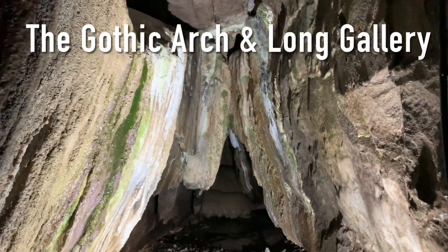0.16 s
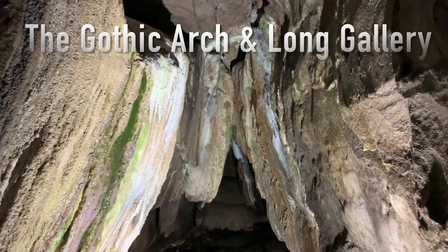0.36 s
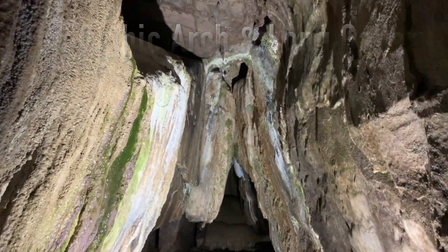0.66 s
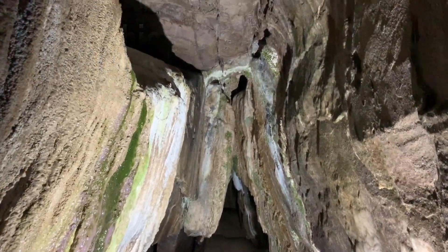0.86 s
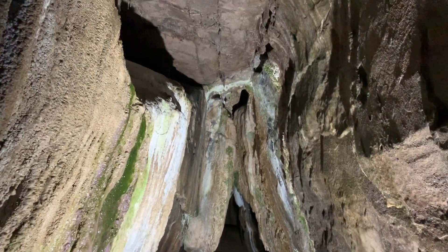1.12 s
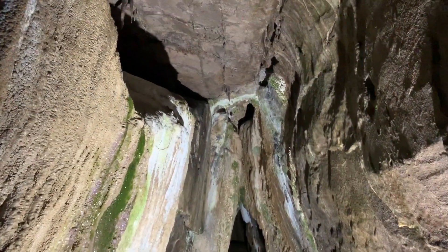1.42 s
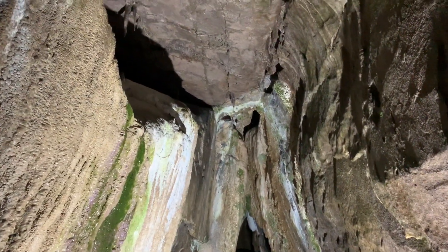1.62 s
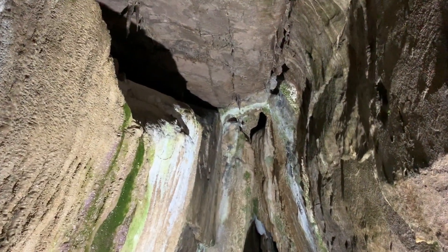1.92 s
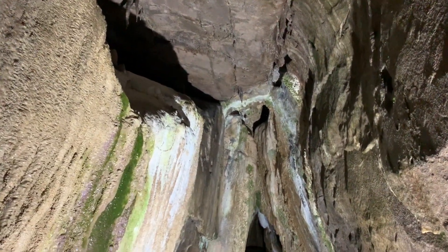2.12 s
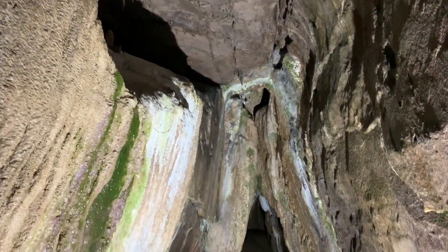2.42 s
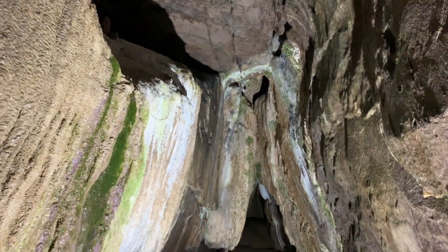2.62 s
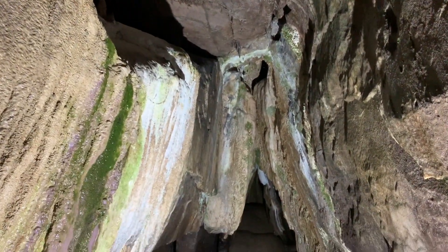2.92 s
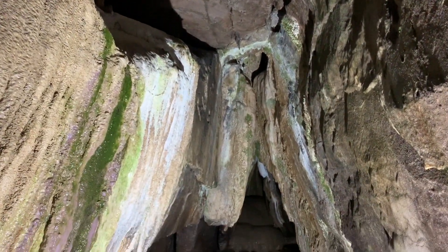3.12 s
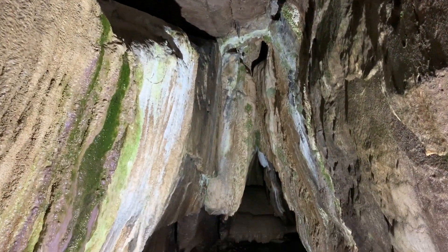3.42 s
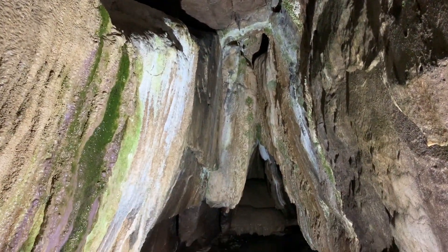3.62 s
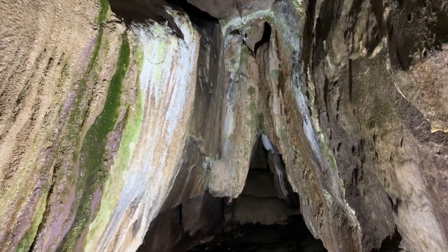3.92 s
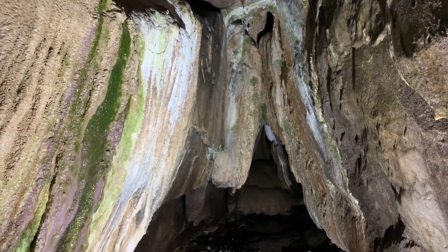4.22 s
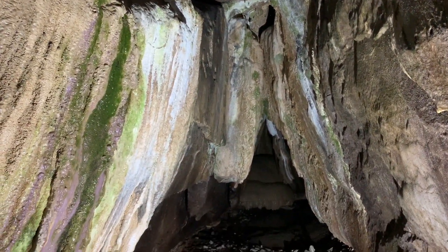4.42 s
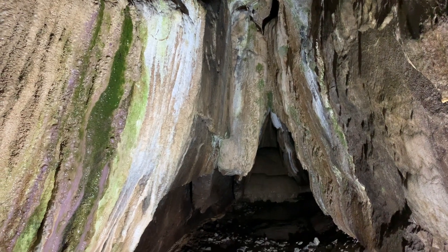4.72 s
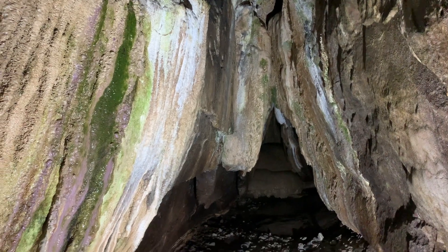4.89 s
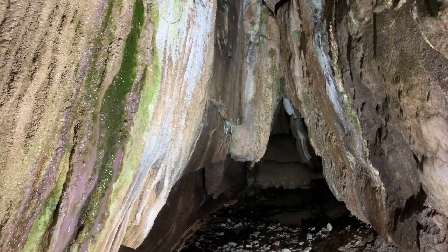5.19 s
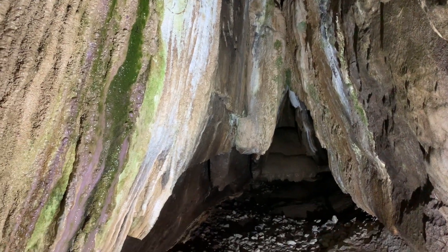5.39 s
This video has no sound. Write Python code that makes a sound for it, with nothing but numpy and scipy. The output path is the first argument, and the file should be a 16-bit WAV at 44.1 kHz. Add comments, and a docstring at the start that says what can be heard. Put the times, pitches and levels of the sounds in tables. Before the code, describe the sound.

A small damp cave, already dripping and echoing as the sound begins. Near drops plop into shallow water, hollow and slightly rising in pitch, crowded in the first half second with a bright plink at 0.3. A loud, dry, woody tick clicks close by at 0.4, a softer one at 0.9. Plops and crisp spatters continue; the dripping thins from about 1.25, with a sharp hissy splash at 1.5. Around 2.05-2.25 a full plop leads into low, gulping bubbles, with another deep gulp at 2.6. Drops thicken again after 3.1; glassy high plinks ring at 3.9 and most strongly at 4.05, with a lower one at 4.16. From 5.05 to the end at about 5.5, plops, bright plinks and low gulps gather. Throughout, far trickling, wavering fine spray, dull wash and faint low rumble surround the wide stereo pair, with short stone reverberation.

```python
"""A narrow rock cave, with water dripping from the roof into a shallow pool, heard by two microphones.
Near drops ring as damped, climbing sines or burst as hissing noise; the walls draw both out into tails.
Larger air pockets gulp now and then, a few dry ticks tap close by, and many far drops trickle and spatter.
Fine spray hisses behind, over a low rumble and wash; the treble of all but the direct drops and ticks
reaches the right microphone first."""
import sys
import numpy as np
from scipy import signal
from scipy.fft import rfft, irfft, next_fast_len
from scipy.io import wavfile

SR = 44100
rng = np.random.default_rng(int(sys.argv[2]) if len(sys.argv) > 2 else 0)


def store_pcm(level_fs):
    """Save levels as 16-bit WAV."""
    pcm = np.round(np.clip(level_fs, -1, 1) * 32767).astype(np.int16)
    wavfile.write(sys.argv[1], SR, np.atleast_2d(pcm).T)


N = 244755
LEAD = SR // 2   # samples that sound before the start, so that the cave already rings
PLACES = 6   # spots in the cave, each with its own echoes
SIZE = next_fast_len(N + 2 * SR)
HZ = np.maximum(np.arange(SIZE // 2 + 1) * SR / SIZE, 1)   # frequency of each spectrum bin

# near drops that trap a bubble: t/s, start level/dB, f/Hz, left minus right/dB, cycles to fall 60 dB
BUBBLE_DROPS = [(.102, -46, 792, -12, 60), (.174, -34, 910, 9.5, 24), (.204, -27, 695, -8, 70),
                (.263, -36, 694, 12.5, 59), (.297, -35, 692, -4, 78), (.2981, -26.5, 4140, -1, 37),
                (.352, -35, 707, 5, 47), (.539, -42.5, 712, -5, 54), (.672, -32.5, 812, 5, 20),
                (.707, -36, 882, -6, 39), (.837, -37, 926, 5, 50), (1.015, -40, 2360, -2, 33),
                (1.027, -48.5, 805, 18, 63), (1.159, -37.5, 823, -3, 35), (1.187, -33.5, 917, 7, 25),
                (1.229, -36, 1316, 8, 43), (1.508, -41, 763, -1, 51), (1.927, -29.5, 1020, 12, 25),
                (2.045, -26, 865, 6, 11.5), (2.304, -38.5, 1200, 7, 30), (2.614, -43, 1127, 6, 46),
                (2.69, -48, 538, 6, 80), (2.775, -44.5, 700, 8, 45), (2.909, -42.5, 1205, 13, 41),
                (2.989, -35.5, 846, -3, 20), (3.145, -35, 807, 8, 75), (3.279, -36, 630, -1, 73),
                (3.311, -27.5, 824, 3, 31.4), (3.345, -39.5, 655, 4, 60), (3.357, -40, 1154, 8, 33),
                (3.519, -46.5, 730, 12, 37), (3.768, -43.5, 880, -7, 36), (3.79, -42, 876, 6, 38),
                (3.85, -33.5, 997, 6, 34), (3.861, -35, 1060, 7, 34), (3.89, -31.5, 3370, -2, 37),
                (3.963, -37, 810, 13.5, 73), (3.994, -45.5, 831, 21, 84), (4.0454, -18.5, 4500, -3, 36),
                (4.129, -36, 1223, 10, 45), (4.1603, -23.5, 2020, -2, 17), (4.189, -39.5, 665, 1.5, 63),
                (4.268, -43, 1030, 7, 64), (4.333, -44.5, 731, -5, 104), (4.3669, -38.5, 2880, 6, 45),
                (4.445, -42, 1980, 0, 40), (4.519, -39, 647, 2, 50), (4.545, -42, 1410, 0, 50),
                (4.55, -38, 612.4, 6.5, 115), (4.818, -41, 672, 1.5, 160), (4.88, -44, 1055, 7, 43),
                (5.058, -41, 1510, 6, 55), (5.061, -30.5, 686, 6, 42), (5.08, -40, 872, 10, 42),
                (5.152, -32, 4760, 2, 25), (5.236, -33.5, 899, 4, 50), (5.295, -40, 1014, 6, 54),
                (5.3095, -23.5, 4460, -7.5, 26), (5.383, -29, 5100, -7, 20), (5.44, -35.5, 872, 3, 42),
                (5.449, -30, 1700, 0, 27), (5.458, -29.5, 1534, 5.5, 83), (5.497, -31.5, 874, 10, 24)]
DROP_RISE, RISE_POWER = 0.044, 0.33   # half the pitch climb as a share, at 1 kHz; higher bubbles climb more
DROP_DIRECT_DB = -3.5   # direct sound of a drop against what feeds the echoes
NEAR_DB_PER_PAN_DB = 0.6455   # drops far to one side fall close by, so they sound drier


def drops():
    """Drops that each trap a bubble; the smaller, higher ones climb further in pitch."""
    rows = []
    for s, db, hz, pan_db, cycles in BUBBLE_DROPS:
        rise = DROP_RISE * (hz / 1000) ** RISE_POWER
        direct_db = DROP_DIRECT_DB + NEAR_DB_PER_PAN_DB * abs(pan_db)
        rows.append((s, db, hz, pan_db, cycles, rise, direct_db))
    return ring_out(rows, flutter_db=3.04, flutter_cycles=7.7)


# near bursts: t/s, level/dB, centre f/Hz, decay time constant/s
SPLASHES = [(0.027, -37.5, 8550, 0.0071), (0.292, -37, 9100, 0.0077), (0.383, -42.5, 9000, 0.01),
            (0.57, -40.5, 10000, 0.0095), (0.666, -37, 1860, 0.0083), (0.68, -44, 4000, 0.034),
            (0.742, -38.5, 9170, 0.0045), (0.87, -46.5, 8300, 0.024), (1.018, -43.5, 10600, 0.005),
            (1.134, -43, 1710, 0.032), (1.149, -45, 3900, 0.022), (1.15, -48, 5600, .02),
            (1.16, -46.5, 2600, 0.041), (1.144, -34, 10000, 0.016), (1.5, -30, 10400, 0.0042),
            (1.62, -41, 9060, 0.039), (2.029, -36.5, 9800, 0.0065), (2.175, -37.5, 4800, 0.0067),
            (2.166, -34.5, 9150, 0.0089), (2.307, -35, 1460, 0.0065), (2.397, -38, 8800, 0.0061),
            (2.4, -43, 4960, 0.012), (2.476, -38, 10700, 0.0056), (2.57, -49, 5470, .006),
            (2.571, -31, 8600, 0.0038), (2.623, -42, 950, 0.015), (2.635, -36.5, 4270, 0.015),
            (2.833, -34, 9600, 0.011), (2.8335, -34, 4670, 0.013), (3.129, -33, 8900, 0.0021),
            (3.143, -35, 1640, .006), (3.24, -35.5, 9200, 0.015), (3.309, -39.5, 5640, 0.015),
            (3.355, -36.5, 2620, 0.011), (3.459, -35, 9100, 0.005), (3.587, -38, 9250, 0.015),
            (3.596, -43.5, 3200, 0.028), (3.632, -34.5, 8950, 0.0063), (3.867, -39.5, 9300, 0.0058),
            (3.973, -40, 9400, 0.0062), (4.048, -41, 4650, 0.038), (4.155, -41.5, 10100, 0.0065),
            (4.187, -36, 9400, 0.0032), (4.359, -38.5, 9600, 0.0075), (4.424, -38, 9700, 0.0063),
            (4.537, -45.5, 960, 0.011), (4.68, -37, 8800, 0.014), (4.699, -39.5, 3470, 0.019),
            (4.706, -37, 4460, 0.015), (4.762, -35.5, 9800, 0.0035), (4.907, -39.5, 8050, 0.016),
            (4.922, -44, 5200, 0.0082), (5.035, -31.5, 9800, 0.0046), (5.0356, -37, 4100, 0.0067),
            (5.036, -41, 5600, .005), (5.05, -43, 3200, .006), (5.21, -39, 9700, 0.012),
            (5.312, -37, 3700, 0.0052), (5.378, -37.5, 9000, 0.0031), (5.447, -38, 9500, 0.0028)]
# width of a burst: centre f/Hz, width/octaves
SPLASH_OCTAVES = [(1000, 0.43), (3000, 0.36), (4700, 0.15), (9000, 0.41)]
# time for the echoes of a splash to fall 60 dB: f/Hz, time/s
SPLASH_T60 = [(1500, 0.25), (5000, 0.49), (9000, 0.4), (15000, 0.35)]
SPRAY_DB, SPRAY_DB_PER_OCTAVE = -8.5, 11   # spray above 11 kHz, for a burst at 9 kHz; duller ones throw less
SPLASH_SWELL_SHARE = 0.43   # time constant of the swell as a share of the decay's
SPLASH_ECHO_DB, ECHO_BUILD_S = -1, 0.0021


def splashes():
    """Noise bursts, each strongest around its own pitch; their echoes are the same power dying away slowly."""
    edges = 707 * 2 ** np.arange(0, 4.6, 1 / 4)   # quarter-octave bands
    centres = np.sqrt(edges[1:] * edges[:-1])
    power = splash_power(centres)
    grains, strays = droplets(), stray_ticks()
    build = np.exp(-1 / (ECHO_BUILD_S * SR))
    out, white = 0, rng.standard_normal((2, 3, N + LEAD))
    for k, (low, high) in enumerate(zip(edges, edges[1:])):
        fall = from_db(-120 / (at_hz(SPLASH_T60, centres[k]) * SR))   # power, hence twice 60 dB
        echo = signal.lfilter([0, 100 / SR], [1, -fall], power[k] + 1e-18) * from_db(2 * SPLASH_ECHO_DB)
        # the walls answer one after another
        echo = signal.lfilter([(1 - build) ** 2], [1, -2 * build, build ** 2], echo)
        noise = rms_one(band(white[k % 2], low, high))   # neighbouring bands get unrelated noise
        out = out + np.sqrt(grains * power[k] + strays * echo) * noise
    spectra = rfft(out, SIZE)
    return microphones(spectra[0], spectra[1:])[:, LEAD:LEAD + N]


def splash_power(centres):
    """Power over time in each band: a quick swell and decay, with spray in the top bands."""
    power = np.zeros((len(centres), N + LEAD))
    t = np.arange(SR // 12) / SR
    near = [(s, db, hz, at_hz(SPLASH_OCTAVES, hz), SPRAY_DB + SPRAY_DB_PER_OCTAVE * np.log2(hz / 9000), length)
            for s, db, hz, length in SPLASHES]
    for s, db, hz, octaves, spray_db, length in near + spatter():
        shape = np.exp(-t / length) * (1 - np.exp(-t / (SPLASH_SWELL_SHARE * length)))
        body = from_db(-4.3 * (np.log2(centres / hz) / octaves) ** 2)
        spray = from_db(spray_db) * (centres > 11000)
        tone = np.hypot(body, spray)[:, None]
        add(power, s, (from_db(db) * tone * shape) ** 2)
    return power


DROPLET_S, DROPLET_DB = 0.0015, 1   # spacing of the level points and their spread


def droplets():
    """Power that wavers from droplet to droplet within a burst; mean 1."""
    step = round(DROPLET_S * SR)
    grains = from_db(2 * DROPLET_DB * rng.standard_normal((N + LEAD) // step + 2))
    return np.interp(np.arange(N + LEAD) / step, np.arange(len(grains)), grains / grains.mean())


STRAYS_PER_S, STRAY_S, STRAY_DB = 90, 0.00072, 3.5   # rate, decay time constant and typical size


def stray_ticks():
    """Stray droplets ticking out of a dying splash: brief uneven jumps of power over a steady 1."""
    hits = (rng.random(N + LEAD) < STRAYS_PER_S / SR) * rng.exponential(1, N + LEAD)
    return 1 + from_db(2 * STRAY_DB) * signal.lfilter([1], [1, -np.exp(-1 / (STRAY_S * SR))], hits + 1e-18)


# deep gulping air pockets, and further drops whose bubbles climb far in pitch: t/s, start level/dB, f/Hz, left
# minus right/dB, # cycles to fall 60 dB, half the pitch climb as a share, direct level against what feeds the
# echoes/dB
CLIMBING_BUBBLES = [(.005, -50.5, 295.7, -3, 70, 0.11, 0), (.259, -40, 957, 6, 52, 0.44, 1),
                    (1.1285, -41, 2990, 0, 180, 0.41, -7), (1.213, -38.5, 879, 4, 76, 1.23, 6),
                    (2.047, -43.5, 277, -16, 25, 0.32, 3), (2.075, -45, 290, -12, 71, 0.49, 2),
                    (2.092, -38.5, 441, 0, 55, 0.15, 1.5), (2.135, -43, 369, -6, 37, .1, 10),
                    (2.166, -44, 473, 0, 42, .1, 3), (2.205, -47.5, 341, -4, 50, 0.25, -4),
                    (2.255, -44, 462, -2, 54, 0.039, 2), (2.6, -39.5, 542, -11, 42, 0.077, 0),
                    (2.614, -36.5, 886, 16, 22.5, 0.48, 11.5), (2.615, -44.5, 173, -7, 21, 0.31, 1.5),
                    (2.612, -41.5, 330, -4, 11.4, .2, 0), (2.635, -49, 110, 0, 16, 0.11, 6),
                    (5.328, -46.5, 204.3, -3, 100, 0.66, 5.5), (5.36, -50.5, 400, 0, 40, 0.11, -7),
                    (5.388, -47, 255.4, -4, 110, 0.025, 8), (5.45, -43.5, 257, -4, 100, 0.036, 5.5),
                    (5.515, -46, 260, 1, 90, .03, 10)]


def gulps():
    """Deep air pockets that gulp, and further drops whose bubbles climb steeply in pitch."""
    return ring_out(CLIMBING_BUBBLES, flutter_db=4, flutter_cycles=4.02)


SWELL_CYCLES, SWELL_SHARE = 1.64, 0.029   # a bubble swells over these cycles plus a share of its ring


def ring_out(rows, flutter_db, flutter_cycles):
    """Bubbles wavering as the surface ripples: direct sound from each side, and sound per place."""
    direct, places = np.zeros((2, N + LEAD)), np.zeros((PLACES, N + LEAD))
    for k, (s, db, hz, pan_db, cycles, rise, direct_db) in enumerate(rows):
        ring = bubble(db, hz, cycles, rise, onset=SWELL_CYCLES + SWELL_SHARE * cycles)
        ripples = rng.standard_normal(64)
        turns = np.arange(len(ring)) * hz / SR
        ring = ring * from_db(flutter_db * np.interp(turns / flutter_cycles, np.arange(64), ripples))
        sides_db = np.array([[pan_db / 2], [-pan_db / 2]])
        add(direct, s, ring * from_db(direct_db + sides_db))
        add(places[k % PLACES], s, ring)
    return direct, places


def bubble(db, hz, cycles, rise, onset=1.62):
    """A damped sine whose pitch climbs as the bubble nears the surface; it swells over its first cycles."""
    turns = np.arange(int(cycles / hz * SR)) * hz / SR
    phase = 2 * np.pi * (turns + rise * turns ** 2 / cycles)
    swell = 1 - np.exp(-(turns / onset) ** 2)
    return from_db(db - 60 * turns / cycles) * swell * np.sin(phase)


# dry ticks close by: t/s, start level/dB, f/Hz, cycles to fall 60 dB
TICKS = [(0.4167, -6, 1590, 3.2), (0.4167, -20, 4300, 5.1), (0.9092, -20, 1060, 5.1)]


def ticks():
    """Short steady-pitched taps near the microphones, without echo."""
    out = np.zeros(N + LEAD)
    for s, db, hz, cycles in TICKS:
        add(out, s, bubble(db, hz, cycles, 0, onset=.7))
    return out[LEAD:]


# time for the cave's echoes to fall 60 dB: f/Hz, time/s
CAVE_T60 = [(200, 0.66), (800, 0.6), (3000, 0.31), (9000, 0.34), (15000, 0.13)]
CAVE_DB, FIRST_ECHO_S = 12.5, 0.0033


def cave(places):
    """Dense echoes, other ones for each place: noise that builds at the first wall and dies by band."""
    t, edges = np.arange(SR) / SR, 80 * 4 ** np.arange(0, 4.1, .75)
    white, tails = rng.standard_normal((PLACES, 3, SR)), 0
    for low, high in zip(edges, edges[1:]):
        t60 = at_hz(CAVE_T60, np.sqrt(low * high))
        # a longer tail is scaled down to carry the same energy
        tails = tails + band(white, low, high) * from_db(-60 * t / t60) / np.sqrt(t60 * SR / np.log(1e6))
    tails = rfft(tails * (1 - np.exp(-(t / FIRST_ECHO_S) ** 2)), SIZE)
    heard = np.sum(tails * rfft(places, SIZE)[:, None], axis=0)
    return from_db(CAVE_DB) * microphones(heard[0], heard[1:])[:, LEAD:LEAD + N]


# far drops, start level of the faintest: f/Hz, level/dB
FAR_DROPS = [(740, -46.5), (900, -50.5), (1300, -48.5), (2200, -44.5), (3200, -59.5), (4500, -40.5),
             (6500, -52)]
FAR_DROP_COUNT, TRICKLE_ECHO_DB = 1500, -3


def trickle():
    """Many far drops at random moments, pitches, sizes and places, as small bubbles."""
    out = np.zeros((PLACES, N + LEAD))
    for k, (when, pitch, size) in enumerate(rng.random((FAR_DROP_COUNT, 3))):
        hz = 760 * (6500 / 760) ** (pitch ** 1.2)
        db = at_hz(FAR_DROPS, hz) - 3.8 * np.log(size + 0.036)   # a few stand out by up to 13 dB
        add(out[k % PLACES], (when * (N + LEAD) - LEAD) / SR, bubble(db, hz, 33.4, 0.047))
    return out


SPATTER_COUNT, SPATTER_DB = 282, -52.5   # small far splashes and the level of the faintest


def spatter():
    """Far splashes at random moments, sizes and pitches, as rows for the splash power."""
    when, size, pitch = rng.random((SPATTER_COUNT, 3)).T
    times = (when * (N + LEAD) - LEAD) / SR
    levels = SPATTER_DB - 2.0 * np.log(size + 0.037)
    # width .2 octaves, spray -30 dB, decay .006 s
    return [(s, db, hz, .2, -30, .006) for s, db, hz in zip(times, levels, 1300 * 5.5 ** pitch)]


# colour of the fine spray: f/Hz, relative level/dB per Hz
SPRAY_COLOUR = [(600, -19), (900, -3.5), (2000, 5.5), (4500, 1), (6000, -3.5), (8300, 3), (11000, 1.5),
                (16000, -3)]
PATTER_PER_S, PATTER_CLICKS_DB = 2500, -11.5   # click rate, and click level against the hiss


def patter():
    """Fine spray: dense uneven clicks under a hiss whose level wavers at random, in each band and overall."""
    clicks = (rng.random((3, N)) < PATTER_PER_S / SR) * rng.choice([-1, 1], (3, N))
    clicks = clicks * from_db(8.0 * np.minimum(rng.exponential(1, (3, N)), 5))
    hiss = coloured(wavering(rng.standard_normal((3, N))), SPRAY_COLOUR)
    return in_time(column=3) * (from_db(PATTER_CLICKS_DB) * coloured(clicks, SPRAY_COLOUR) + hiss)


BAND_WAVER_DB, OVERALL_WAVER_DB = 3, 2   # spread of the random level in each band, and overall
LEVEL_POINTS_PER_S = 26


def wavering(white):
    """Noise cut into third-octave bands, each wavering in level on its own and with the rest."""
    edges, out = 500 * 2 ** np.arange(0, 5.1, 1 / 3), 0
    spectrum, hz = rfft(white), np.arange(N // 2 + 1) * SR / N
    knots = rng.standard_normal((len(edges), 400))   # the last row is shared by all bands
    for low, high, waver in zip(edges, edges[1:], knots):
        waver_db = BAND_WAVER_DB * waver + OVERALL_WAVER_DB * knots[-1]
        gain_db = np.interp(np.arange(N) / SR * LEVEL_POINTS_PER_S, np.arange(len(waver)), waver_db)
        out = out + from_db(gain_db) * irfft(spectrum * ((hz >= low) & (hz < high)), N)
    return out


# colour of the low roar: f/Hz, relative level/dB per Hz
ROAR_COLOUR = [(25, -66), (50, -17), (80, -12), (99, 0), (118, -9), (140, -0.5), (180, -14), (260, -36)]
# colour of water slopping deep inside: f/Hz, relative level/dB per Hz
WASH_COLOUR = [(120, -10.5), (220, 1.5), (450, 0.5), (700, 1.5), (1000, -22)]


def rumble():
    """A low roar held in two deep bands of the rock, and a duller wash above it, each swelling and sinking."""
    roar = in_time(column=1) * coloured(rng.standard_normal((3, N)), ROAR_COLOUR)
    wash = in_time(column=2) * coloured(rng.standard_normal((3, N)), WASH_COLOUR)
    return roar + wash


# background levels: t/s, rumble level/dB, wash level/dB, spray level/dB
SWELL = [(0.0, -57, -57, -46), (0.04, -54.5, -54.5, -42.5), (1.16, -64.5, -62.5, -49),
         (2.04, -64.5, -65, -46.5), (2.29, -57, -51.5, -43), (2.56, -60, -57.5, -46.5),
         (2.641, -54, -52, -45.5), (2.92, -57, -56.5, -45), (3.76, -64.5, -63.5, -48.5),
         (3.86, -58, -61, -49), (4.14, -64, -65, -46), (4.6, -62.5, -58, -49.5), (5.2, -59.5, -57, -47),
         (5.35, -56.5, -51.5, -45), (5.55, -61, -49.5, -42.5)]


def in_time(column):
    """Gain in time from a column of the swell table."""
    return from_db(np.interp(np.arange(N) / SR, np.array(SWELL)[:, 0], np.array(SWELL)[:, column]))


def coloured(white, spectrum):
    """Three unrelated draws through a spectrum and the microphones; rms 1."""
    shaped = rfft(white, SIZE) * from_db(at_hz(spectrum, HZ))
    return rms_one(microphones(shaped[0], shaped[1:])[:, :N])


# what both microphones share: f/Hz, share of power (0 to 1)
LIKENESS = [(30, .4), (70, .85), (130, .45), (300, .3), (700, .42), (950, .55), (1300, .25), (1900, .3),
            (2500, .1), (4300, .33), (5500, .22), (6800, .9), (9000, .92), (11500, .96), (16000, .9)]
# how late the shared wave reaches the left microphone: f/Hz, lag/ms
LEFT_LAG = [(1200, 0), (1900, .15), (3500, .2172)]


def microphones(shared, own):
    """Two microphones hear one shared wave, late on the left, and a part of their own (spectra in, sound out)."""
    alike = np.clip(at_hz(LIKENESS, HZ), 0, 1)
    late = np.exp(-2j * np.pi * HZ * at_hz(LEFT_LAG, HZ) / 1000)
    arrivals = np.array([late, np.ones_like(late)])
    return irfft(np.sqrt(alike) * shared * arrivals + np.sqrt(1 - alike) * own, SIZE)


def from_db(db):
    """Decibels to gain."""
    return 10 ** (np.asarray(db) / 20)


def rms_one(x):
    """Scale to rms 1."""
    return x / np.sqrt(np.mean(x ** 2) + 1e-20)


def at_hz(points, hz):
    """Read a table on a log-frequency axis."""
    points = np.array(points)
    return np.interp(np.log(hz), np.log(points[:, 0]), points[:, 1])


def band(x, low, high):
    """Band-pass."""
    return signal.sosfilt(signal.butter(2, [low, high], "band", fs=SR, output="sos"), x)


def add(out, s, sound):
    """Mix a sound in at a time in seconds."""
    i = round(s * SR) + LEAD
    out[..., i:i + sound.shape[-1]] += sound[..., :N + LEAD - i]


def scene():
    """Near and far drops, their echoes, splashes, ticks, spray and the rumble."""
    drops_direct, drop_places = drops()
    gulps_direct, gulp_places = gulps()
    far = trickle()
    far_direct = np.array([far[::2].sum(axis=0), far[1::2].sum(axis=0)])   # alternate places left and right
    direct = (drops_direct + gulps_direct + far_direct)[:, LEAD:]
    echoes = cave(drop_places + gulp_places + from_db(TRICKLE_ECHO_DB) * far)
    return direct + echoes + splashes() + patter() + rumble() + ticks()


def record(dry):
    """The sound ends steeply above 15.85 kHz."""
    return signal.sosfilt(signal.ellip(14, .5, 60, 15850, fs=SR, output="sos"), dry)


dry = scene()
out = record(dry)
store_pcm(out)
```